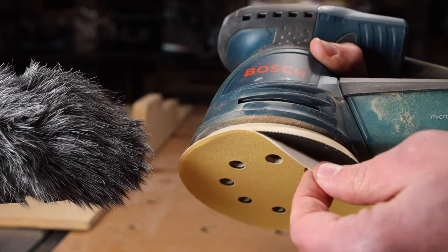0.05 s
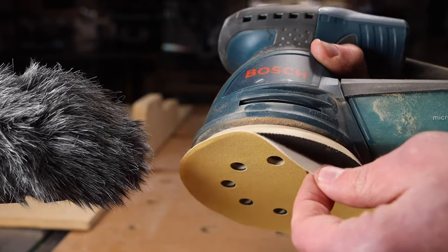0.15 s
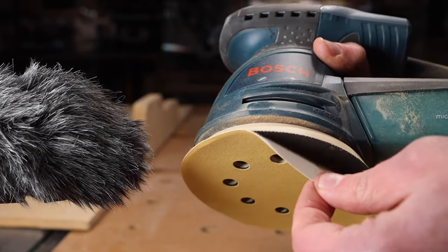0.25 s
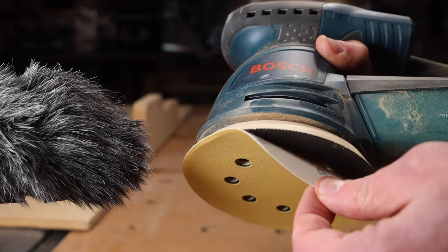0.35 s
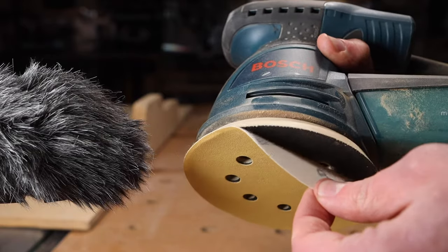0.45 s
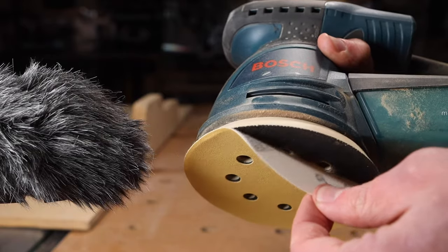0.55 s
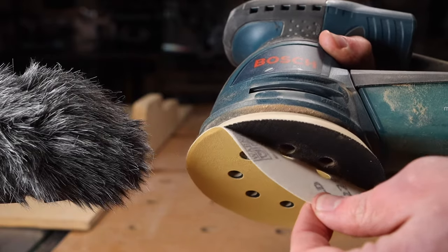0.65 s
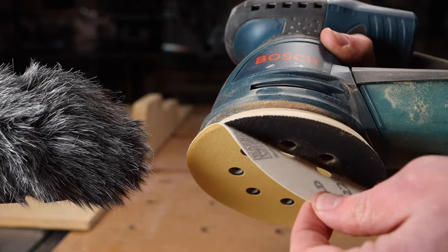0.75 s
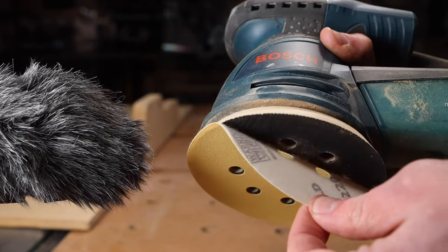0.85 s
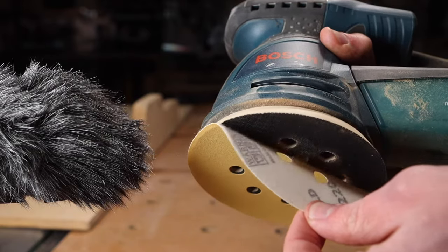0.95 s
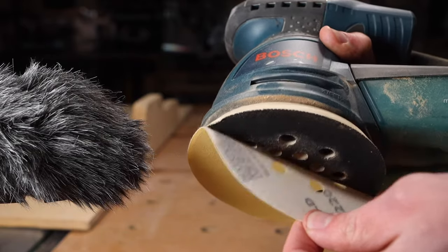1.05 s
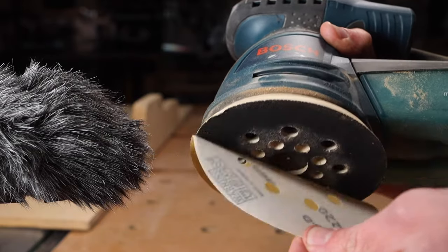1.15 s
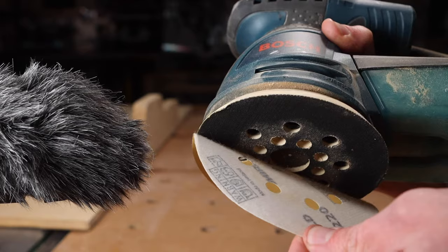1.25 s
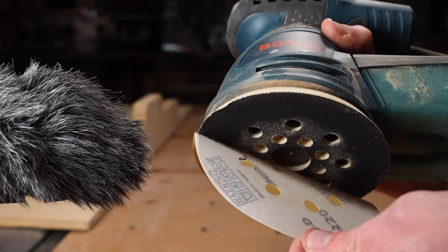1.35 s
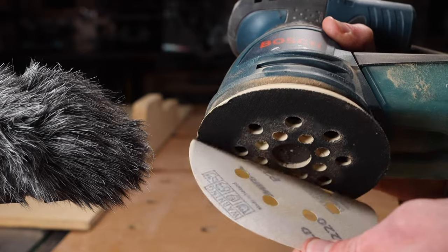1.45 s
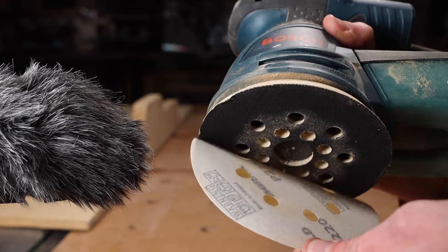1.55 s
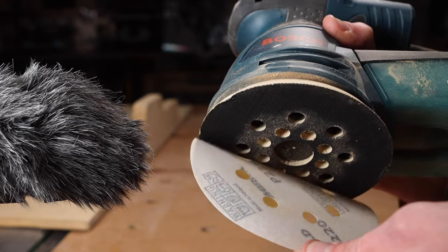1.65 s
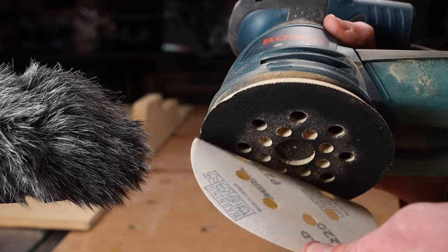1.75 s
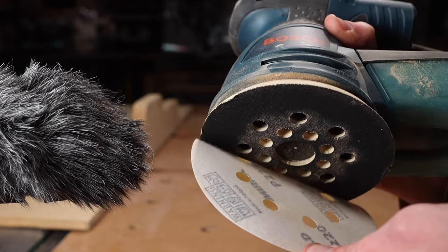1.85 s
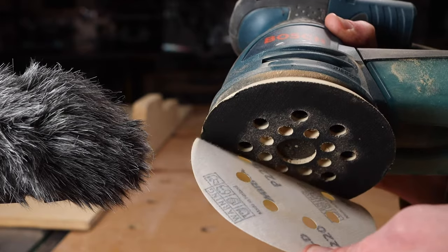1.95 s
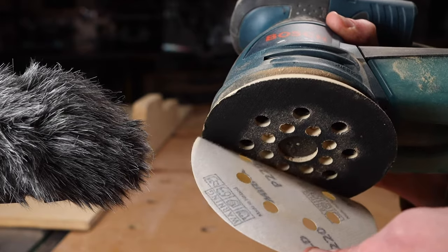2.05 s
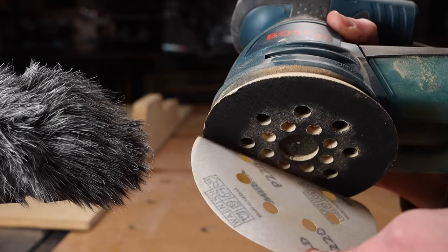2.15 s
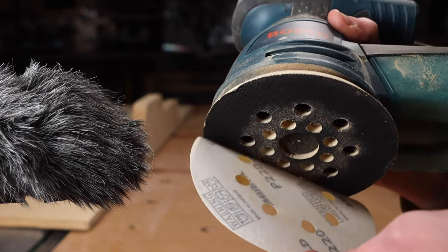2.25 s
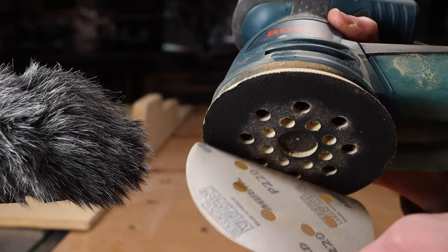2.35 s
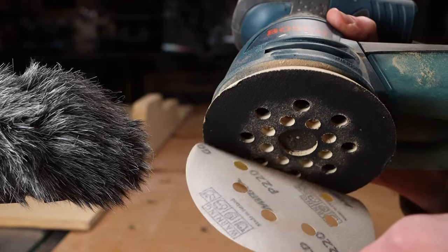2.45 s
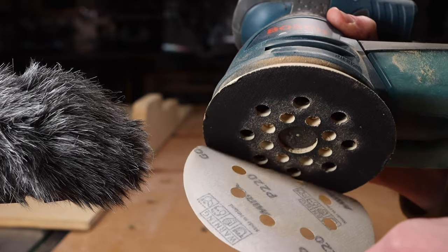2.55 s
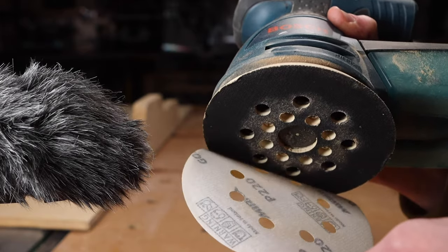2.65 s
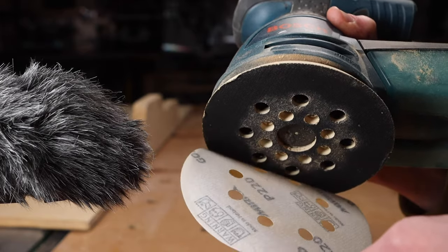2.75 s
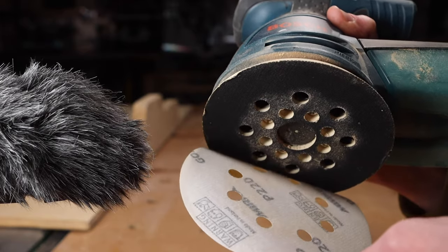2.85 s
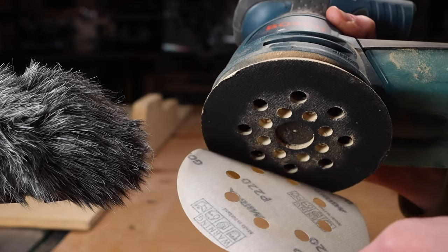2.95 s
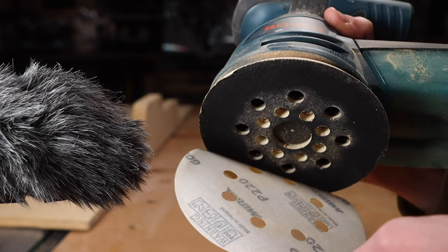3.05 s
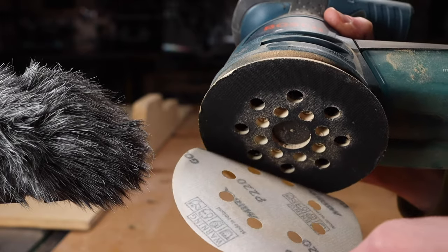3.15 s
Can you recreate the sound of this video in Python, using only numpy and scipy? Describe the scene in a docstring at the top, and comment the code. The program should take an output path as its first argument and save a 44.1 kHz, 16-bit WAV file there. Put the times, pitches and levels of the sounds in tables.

```python
"""In a workshop, close to the microphone, a sanding disc is peeled off a hook-and-loop pad.
Each hook that lets go is an impulse: a snap, damped modes of the paper disc and a rustle of fibres.
Hooks release a few at once or in runs; hard pulls shake the pad with low, filtered noise.
The bending disc buckles in soft low notes that sag in pitch.
The room answers faintly with decaying noise, over steady quiet air."""
import sys
import numpy as np
from scipy import signal
from scipy.fft import rfft, irfft
from scipy.io import wavfile
from scipy.ndimage import uniform_filter1d

SR = 44100
rng = np.random.default_rng(int(sys.argv[2]) if len(sys.argv) > 2 else 0)


def voltage_ratio(level):
    """Linear amplitude factor for a level in decibels (scalar or array-like)."""
    return 10 ** (np.asarray(level, float) / 20)


def unload_wav(signal):
    """Save mono or channel-first audio to the path in sys.argv[1] as 16-bit WAV at rate SR, clipped to [-1, 1]."""
    wavfile.write(
        sys.argv[1],
        SR,
        np.round(np.clip(np.atleast_2d(signal).T, -1, 1) * 32767).astype(np.int16),
    )


N = 141120

# A few hooks letting go at once: start_s, level_db
HOOK_SNAPS = [(0.0044, -25.5), (0.102, -29), (0.114, -32), (0.125, -34), (0.132, -27.5), (0.146, -31),
              (0.1543, -36), (0.1627, -27.5), (0.176, -23), (0.409, -17.5), (0.4618, -20), (0.4764, -33),
              (0.4847, -31), (0.5217, -26.5), (0.533, -34), (0.54, -23), (0.7106, -17), (0.7679, -24.5),
              (0.8098, -23), (0.8274, -20), (0.9432, -13.5), (0.9496, -16.5), (1.132, -7), (1.4136, -21.5),
              (1.5187, -21), (1.562, -21.5), (1.5857, -25), (1.6336, -27), (1.6452, -30), (1.6949, -20),
              (1.7178, -14), (1.7554, -30), (1.8326, -16), (1.8543, -20), (1.8647, -17.5), (1.872, -19),
              (1.959, -30.5), (1.9877, -31), (2.026, -31), (2.0395, -24), (2.0527, -19.5), (2.2018, -26),
              (2.3035, -17.5), (2.4554, -32), (2.469, -27.5), (2.6014, -23.5), (2.723, -24), (2.78, -28.5),
              (2.7954, -15.5), (2.924, -25), (3.0651, -28), (3.0924, -30), (3.117, -25), (3.1285, -18.5),
              (3.176, -29), (3.1873, -22.5)]
# Runs of hooks letting go: start_s, length_s, level_db
HOOK_RUNS = [(0.0166, 0.0083, -31.0), (0.182, 0.0107, -28.5), (0.2054, 0.0279, -21),
             (0.2434, 0.0048, -21.5), (0.2542, 0.0084, -25), (0.2682, 0.0262, -19), (0.3004, 0.0465, -21),
             (0.3524, 0.0467, -25), (0.4145, 0.0431, -25.5), (0.4684, 0.0048, -22.5), (0.5456, 0.0068, -25),
             (0.564, 0.0064, -28), (0.5731, 0.0466, -20.5), (0.6249, 0.0469, -17.0),
             (0.6786, 0.0267, -20.5), (0.7168, 0.02, -27), (0.7756, 0.0078, -35.5), (0.84, 0.0047, -25),
             (0.8685, 0.0422, -24.5), (0.9166, 0.0196, -20.5), (0.9565, 0.0176, -23), (0.9903, 0.0146, -19),
             (1.0096, 0.021, -21), (1.0363, 0.0404, -20.5), (1.0809, 0.0383, -16), (1.1252, 0.0159, -18),
             (1.1468, 0.0401, -14.5), (1.1905, 0.0408, -17.5), (1.3841, 0.0044, -20.5),
             (1.3963, 0.0078, -36), (1.4222, 0.0065, -24.5), (1.4346, 0.0784, -17), (1.5327, 0.0092, -23),
             (1.6024, 0.0063, -24.5), (1.6685, 0.0046, -27), (1.6792, 0.0063, -19.5), (1.7008, 0.0121, -28),
             (1.7251, 0.0233, -21.0), (1.7623, 0.0058, -26.5), (1.8435, 0.0066, -25.5),
             (1.9131, 0.0228, -29), (2.0022, 0.0071, -22), (2.0656, 0.0107, -25), (2.0842, 0.0047, -29),
             (2.0949, 0.049, -27.5), (2.2242, 0.0393, -27), (2.2694, 0.022, -24), (2.3183, 0.0337, -22.5),
             (2.3596, 0.0138, -21.5), (2.3786, 0.0097, -24.5), (2.3941, 0.0126, -21.5),
             (2.421, 0.0076, -27), (2.4809, 0.0073, -33), (2.4998, 0.0145, -26), (2.5193, 0.0426, -22),
             (2.5705, 0.0256, -25), (2.6075, 0.0079, -28), (2.6423, 0.0084, -25.5), (2.6579, 0.0607, -23),
             (2.8136, 0.0133, -30.5), (2.8415, 0.0079, -35.5), (2.8985, 0.0058, -29.5),
             (2.912, 0.0089, -28), (2.9397, 0.0092, -24), (2.9532, 0.0107, -28), (2.9739, 0.0095, -29),
             (3.0479, 0.0046, -34), (3.0784, 0.0053, -31.5), (3.1066, 0.0042, -29), (3.1465, 0.0071, -23),
             (3.16, 0.0086, -27.5)]
# Resonances of the paper disc: pitch_hz, relative_level_db, t60_s
DISC_MODES = [(1643, -5, 0.012), (3160, -8.5, 0.022), (4414, -9, 0.012), (5593, -2.5, 0.0091)]
# Colour of the tear while most of the disc is held: frequency_hz, gain_db
HELD_COLOUR = [(100, -40), (900, -19), (1500, -4.5), (3100, -2.5), (6000, 0.5), (7200, -0.5), (8000, -3),
               (16000, -10.5)]
# Colour of the tear when most of the disc hangs free: frequency_hz, gain_db
FREE_COLOUR = [(100, -60), (850, -23.5), (1500, -3.5), (3000, -6.5), (5500, 0.5), (7900, -3.5), (9500, -5),
               (16000, -14)]
# Progress of the peel: time_s, free_share (0 to 1)
PEEL_PROGRESS = [(1.1, 0), (1.9, 0.9)]
# Colour of the low shake while the disc is held: frequency_hz, gain_db
HELD_SHAKE = [(30, -30), (120, -4), (240, -4.5), (390, -2), (620, -4.5), (1500, -63)]
# Colour of the low shake when the disc hangs free: frequency_hz, gain_db
FREE_SHAKE = [(30, -20), (160, -4), (300, -8.5), (560, 0), (1500, -31.5)]
# Buckling notes of the bending disc: centre_s, pitch_hz, level_db
DISC_BUCKLES = [(.65, 340, -31), (1.085, 410, -24), (1.099, 162, -35.5), (1.491, 239, -42),
                (1.519, 90, -45), (2.361, 174, -49), (2.68, 430, -43)]
# Decay of the room: frequency_hz, t60_s
ROOM_DECAY = [(200, 0.24), (3000, 0.27), (16000, 0.28)]
# Colour of the room's tail as it starts: frequency_hz, gain_db
ROOM_TINT = [(1700, 3.5), (2800, 6), (16000, -3.5)]
# Colour of the quiet air: frequency_hz, gain_db
AIR_COLOUR = [(25, -20.5), (120, -10.5), (600, -19), (5000, -20.5), (16000, -48)]


def rms(x):
    """Root mean square: the square root of the mean power."""
    return np.sqrt(np.mean(x ** 2))


def unit(x):
    """Normalisation: a signal divided by its rms has unit power."""
    return x / np.sqrt(np.mean(x ** 2) + 1e-20)


def along(points, hz):
    """Logarithmic frequency: values are interpolated between (Hz, value) points on a log axis."""
    f, v = np.transpose(points)
    return np.interp(np.log(hz + 1), np.log(f + 1), v)


def coloured(x, points):
    """Minimum phase: folding the cepstrum makes a causal filter of the (Hz, dB) gains."""
    m = 4096
    gain = voltage_ratio(along(points, np.fft.rfftfreq(m, 1 / SR)))
    cepstrum = irfft(np.log(gain), m)
    fold = np.r_[1, 2 * np.ones(m // 2 - 1), 1, np.zeros(m // 2 - 1)]
    impulse = irfft(np.exp(rfft(cepstrum * fold)), m)[:m // 2]
    return signal.fftconvolve(x, impulse)[:N]


def peeled(x, held, free):
    """Changing boundary: the colour crossfades from held to free as the disc comes off."""
    share = np.interp(np.arange(N) / SR, *np.transpose(PEEL_PROGRESS)).clip(0, 1)
    return coloured(x * (1 - share), held) + coloured(x * share, free)


def hooks():
    """Point process: powers of exponential waits bunch the releases; each run keeps its level."""
    snap_s, hooks_per_s = 0.001, 2000
    size_db, bunching = 4.5, 1.45  # scatter of hook sizes, unevenness of the waits
    events = [(s, snap_s, db) for s, db in HOOK_SNAPS] + list(HOOK_RUNS)
    times, gains, runs = [], [], []
    for k, (start, length, db) in enumerate(events):
        n = 1 + round(length * hooks_per_s)
        wait, size = rng.exponential(size=(2, n))
        t = np.cumsum(wait ** bunching) - wait[0] ** bunching
        times.append(start + length * t / (t[-1] + 1e-9))
        hook_gain = unit(voltage_ratio(size_db * np.minimum(size, 2)))
        # Each hook will have unit energy, so this sets the mean power of the run
        share = np.sqrt((length + snap_s) * SR / n)
        gains.append(hook_gain * voltage_ratio(db) * share)
        runs.append(np.full(n, k))
    return np.concatenate(times), np.concatenate(gains), np.concatenate(runs)


def spike(t, n):
    """Impulsive release: the pull-back is half a Gaussian pulse of random width."""
    mean_width_s = 0.00003
    width = mean_width_s * 2 * rng.random((n, 1)) + 1e-9
    return -np.exp(-(t / width) ** 2)


def rustle(t, n):
    """Friction of fibres: one-pole lowpassed noise decays exponentially."""
    start_db, t60_s, dullness = -11.5, 0.009, 0.5  # dullness is the filter's pole
    fibres = signal.lfilter([1], [1, -dullness], rng.standard_normal((n, len(t))), axis=1)
    return voltage_ratio(start_db - 60 * t / t60_s) * unit(fibres)


def ring(t, runs):
    """Modal superposition: damped sines, mixed anew by run and by hook, form the disc's response."""
    ring_db, hook_scatter_db, run_scatter_db = -17, 3, 2.2
    detune = 0.05  # relative pitch scatter, by hook and again by run
    total = np.zeros((len(runs), len(t)))
    for hz, db, t60 in DISC_MODES:
        hook_level, hook_tune = rng.standard_normal((2, len(runs), 1))
        run_level, run_tune = rng.standard_normal((2, runs.max() + 1, 1))[:, runs]
        level = ring_db + db + run_scatter_db * run_level + hook_scatter_db * hook_level
        pitch = hz * (1 + detune * (hook_tune + run_tune))
        total -= voltage_ratio(level - 60 * t / t60) * np.sin(2 * np.pi * pitch * t)
    return total


def tear():
    """Superposition of impulses: the grains of all hooks add up and take the peel's colour."""
    times, gains, runs = hooks()
    t = np.arange(SR // 120) / SR
    n = len(times)
    grain = rustle(t, n) + spike(t, n) + ring(t, runs)
    grain = grain * (gains / np.linalg.norm(grain, axis=1))[:, None]
    at = np.round(times * SR).astype(int)[:, None] + np.arange(len(t))
    x = np.bincount(at.ravel(), grain.ravel(), N + SR)[:N]
    return unit(peeled(x, HELD_COLOUR, FREE_COLOUR)) * rms(x)


def pad(crackle):
    """Nonlinear excitation: the low shake grows faster than the crackle that drives it."""
    level_db, smooth_s = -21, 0.054  # level relative to the crackle's rms
    extra_growth = 0.36  # added exponent of the driving amplitude
    power = np.abs(uniform_filter1d(crackle ** 2, size=int(smooth_s * SR)))
    envelope = np.sqrt(np.abs(uniform_filter1d(crackle ** 2, size=900)))
    jolts = envelope * rng.standard_normal(N)
    shake = peeled(jolts * power ** (extra_growth / 2), HELD_SHAKE, FREE_SHAKE)
    return voltage_ratio(level_db) * unit(shake) * rms(crackle)


def buckles():
    """Chirped resonance: each buckle is a Gaussian swell of a few cycles that sags in pitch."""
    cycles, sag = 7.5, 0.29  # length of the swell, share of the pitch lost across it
    s, hz, db = np.transpose(DISC_BUCKLES)[:, :, None]
    u = (np.arange(N) / SR - s) * hz / cycles  # time in swell lengths
    turns = cycles * (u - sag * u ** 2 / 2) + rng.random(s.shape)
    return np.sum(voltage_ratio(db) * np.exp(-2 * u ** 2) * np.sin(2 * np.pi * turns), axis=0)


def room_tail():
    """Diffuse reverberation: noise in which each frequency decays at its own rate."""
    hz, t, z = signal.stft(rng.standard_normal(SR // 2), SR, nperseg=256)
    start_db = along(ROOM_TINT, hz)[:, None]
    fall_db = 60 * t / along(ROOM_DECAY, hz)[:, None]
    tail = signal.istft(z * voltage_ratio(start_db - fall_db), SR, nperseg=256)[1]
    return tail / np.linalg.norm(tail)


def room(x):
    """Convolution: every tenth of a second of sound excites a new tail of the workshop."""
    level_db = -18
    out, step = np.zeros(N + SR), SR // 10
    for i in range(0, N, step):
        wet = signal.fftconvolve(x[i:i + step], room_tail())
        out[i:i + len(wet)] += wet
    return voltage_ratio(level_db) * out[:N]


def quiet_air():
    """Stationary noise: filtered Gaussian noise at a constant level is the workshop's air."""
    level_db = -56.5
    return voltage_ratio(level_db) * unit(coloured(rng.standard_normal(N), AIR_COLOUR))


def scene():
    """Linear superposition: disc, pad, room and air add at the microphone."""
    crackle = tear()
    near = crackle + pad(crackle) + buckles()
    return (near + room(near) + quiet_air())[None]


def top_cut(x):
    """Nothing passes above the cut-off."""
    return signal.sosfilt(signal.butter(12, 15900, fs=SR, output="sos"), x)


def record(dry):
    """Saturation: a smooth curve rounds off loud snaps near full scale."""
    ceiling = 1.14  # amplitude that the curve approaches
    mix = dry / (1 + np.abs(dry / ceiling) ** 6) ** (1 / 6)
    return top_cut(mix)


dry = scene()
out = record(dry)
unload_wav(out)
```